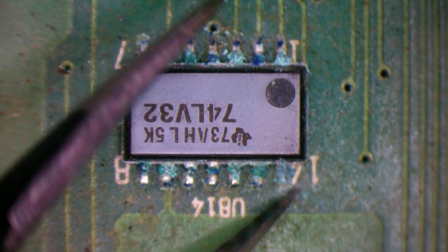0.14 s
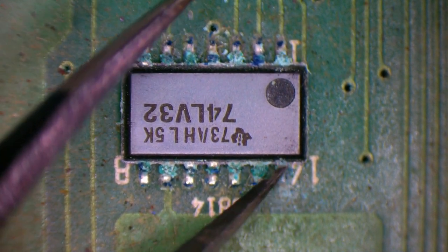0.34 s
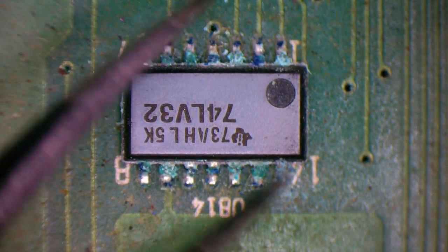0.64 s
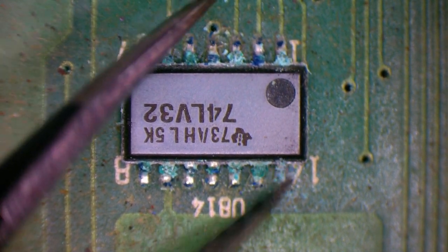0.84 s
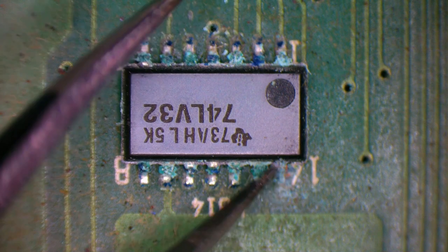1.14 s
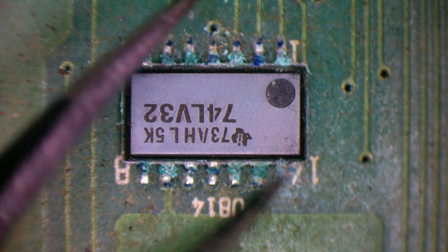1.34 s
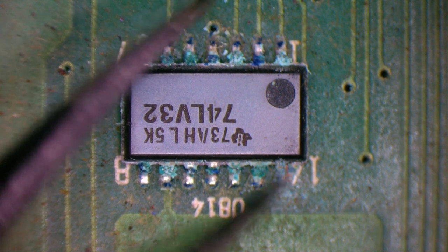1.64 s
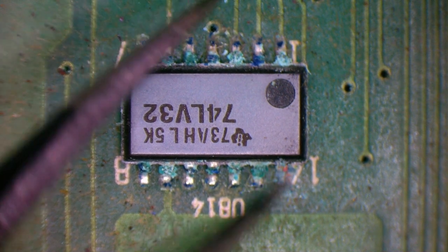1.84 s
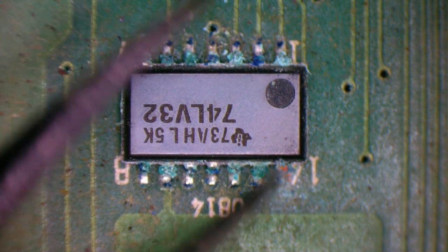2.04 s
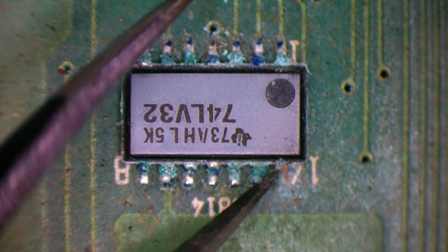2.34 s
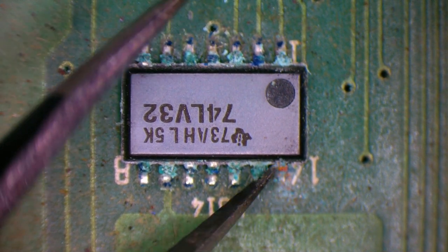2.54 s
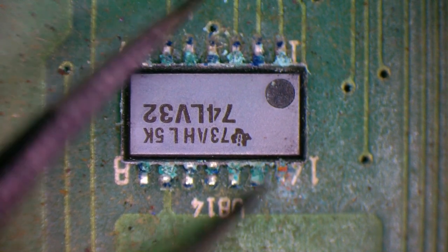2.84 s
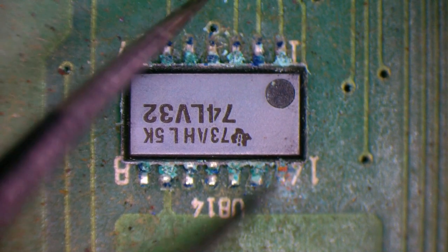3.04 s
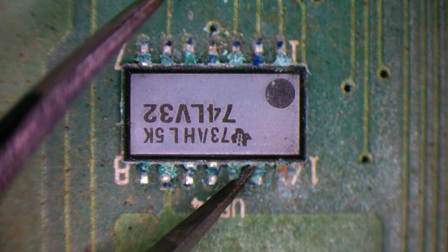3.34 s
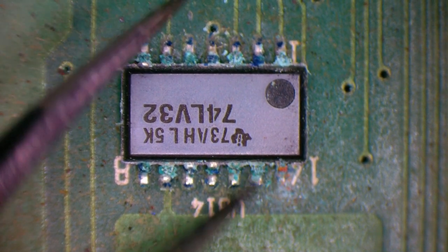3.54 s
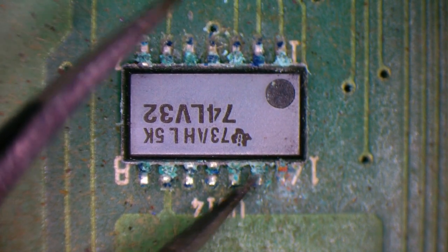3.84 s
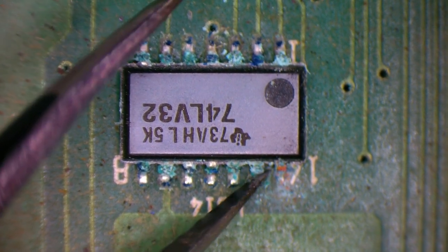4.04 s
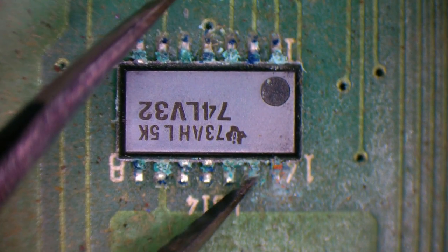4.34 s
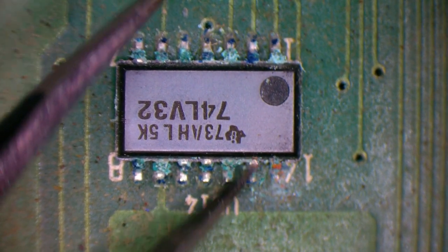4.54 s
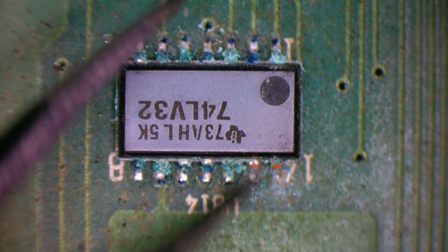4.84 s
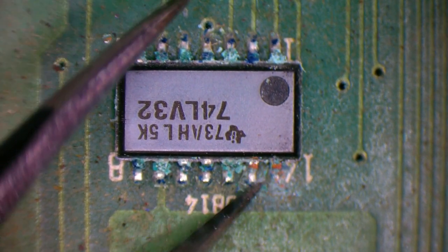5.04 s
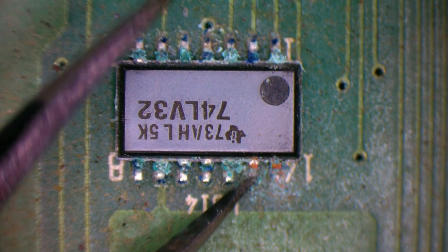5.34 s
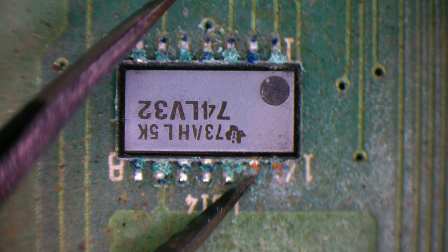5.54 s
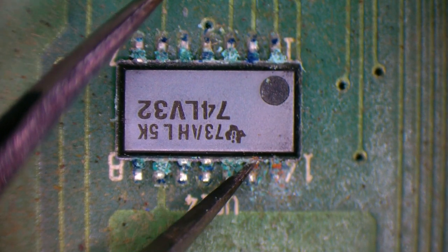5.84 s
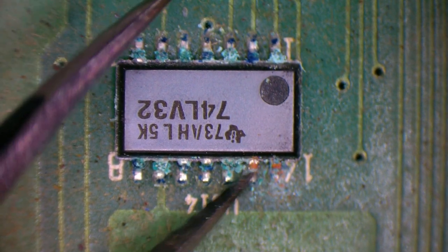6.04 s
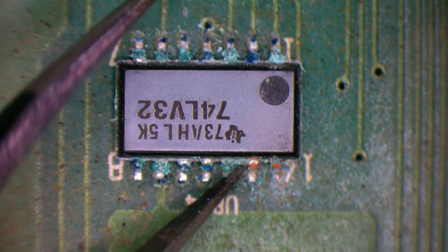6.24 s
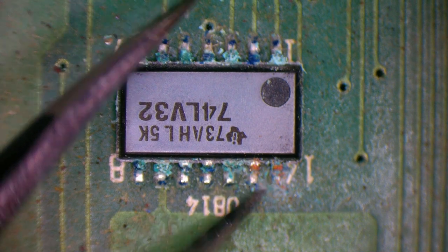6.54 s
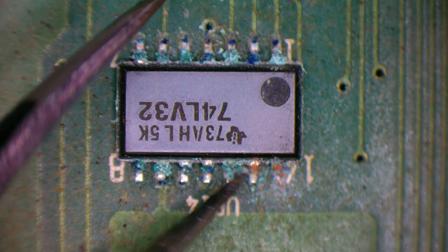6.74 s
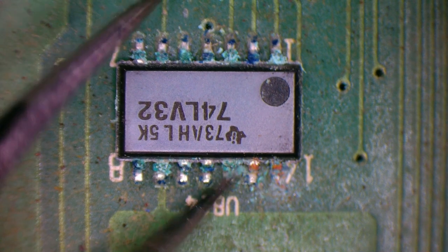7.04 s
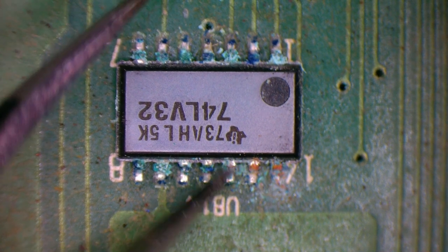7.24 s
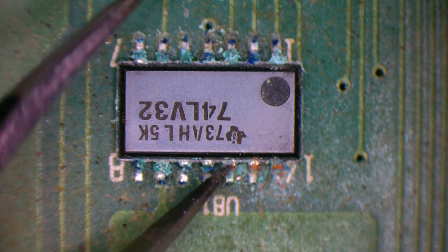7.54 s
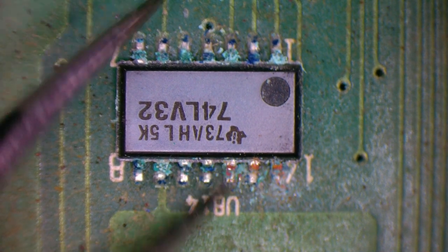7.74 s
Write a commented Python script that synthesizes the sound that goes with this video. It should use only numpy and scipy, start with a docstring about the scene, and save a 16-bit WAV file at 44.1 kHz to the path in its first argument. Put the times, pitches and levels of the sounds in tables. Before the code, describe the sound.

Fine steel tweezers pick at the legs of a chip on a circuit board, heard close up in a small room. Quiet, dry metallic ticks start right away and continue unevenly, several a second, often doubled as the tip grazes a leg before landing. Sharper clicks stand out at about 0.6, 1.6, 2.2 and 4.2 seconds, and one of the strongest comes at 7.5 seconds, with a last tick just after.

Very brief, gritty scrapes over solder slip in between the taps, clearest around 1.5, 2.1 and 2.7 seconds, then fainter between 4.3 and 4.8 seconds. Firmer touches add a soft, dull knock from the bench, as near 0.8, 4 and 7.4 seconds. The ticking is a little lighter from about 5 to 6.5 seconds. A steady low electrical hum runs underneath throughout, with a deep rumble and a faint hiss.

```python
"""Fine steel tweezers pick at the legs of a chip on a circuit board, close up in a small room.
Each touch is a millisecond or two of tiny slips that rings the board and the steel; sharp ones
crack the solder and firm ones thump the bench. Now and then the tip drags over solder with a rasp.
Mains hum, rumble and a faint hiss lie underneath."""
import sys
import numpy as np
from scipy import signal
from scipy.fft import rfft, irfft
from scipy.io import wavfile
from scipy.ndimage import uniform_filter1d

SR = 44100
rng = np.random.default_rng(int(sys.argv[2]) if len(sys.argv) > 2 else 0)


def inscribe(sig):
    """Save sig as 16-bit PCM at rate SR to the path in sys.argv[1].

    A 1-D sig is mono; a 2-D sig holds one channel per row.
    Samples are clipped to [-1, 1] before scaling.
    """
    pcm = np.round(np.clip(np.atleast_2d(sig).T, -1, 1) * 32767)
    wavfile.write(sys.argv[1], SR, pcm.astype(np.int16))


N = 347508

# touches of the tip: start_s, strength_db, hardness_db, push_db, weight_db
# the last three add to the strength, for the treble, the board and the bench in turn
TOUCHES = [(0.144, -61.5, 0, 4, 6), (0.1574, -63, -3, 4, -8), (0.3183, -57.5, -16, 7.5, -11),
           (0.3459, -54, -1.5, 3.5, -4), (0.5133, -70.5, -12, 11, -5), (.591, -48.5, 3, -1.5, -8),
           (.763, -58.5, -5, -5, -8), (0.7704, -60, 2.5, 5, 9), (.9377, -67, -7, 3, -8),
           (1.006, -62, 7, 5, -3), (1.141, -53.5, -7.5, 3.5, -14), (1.361, -56.5, -14, -10, -10),
           (1.3677, -59, 2.5, 4, -6), (1.5526, -48.5, -8, -8, -15), (1.564, -56, -4, -13, -15),
           (1.5686, -46, 5.5, -2, -2), (1.7482, -58, -5, -12, -10), (1.7518, -56.5, -11, 12, -3),
           (1.91, -76, -8, 20, 0), (1.9839, -56, 13.5, 4.5, 1), (2.161, -50.5, 0.5, 3, 1),
           (2.177, -68, -4, 7, -8), (2.1905, -63, 1, -4, 4), (2.3346, -63, -10, 7.5, -6),
           (2.3835, -72, 8, -5, -8), (2.5738, -52.5, 5, 7.5, -16), (2.5797, -57, 4.5, 5, -12),
           (2.763, -65, 0, 1, -10), (2.793, -60, -6, 0, -12), (3.0172, -57.5, 6.5, -3, -10),
           (3.0222, -66.5, 7, 10, -6), (3.249, -63.5, 4, 7, -8), (3.559, -61.5, 2.5, 2, -10),
           (3.741, -64, -10, 0, -8), (3.919, -65.5, -16, 10, -2), (3.9542, -59.5, 7, 3, 13),
           (4.2336, -54.5, -5, -2, -2), (4.243, -52, 5, -12, 2.5), (4.362, -62.5, 6.5, 8, -6),
           (4.3672, -60, -9, 2, -7), (4.5361, -68, -11, 11, -5), (4.564, -55.5, -6, 5.5, -10),
           (4.723, -69, -13, 13.5, -5), (4.761, -58, 7, 8, 2), (4.9467, -61, -1, 0, -12),
           (5.131, -65, 4, -12, -10), (5.1353, -60.5, -2, 11.5, 4), (5.478, -57.5, 0.5, 1, 2),
           (5.6648, -59.5, 4, 6.5, -12), (5.7614, -78, 14.5, 6, -5), (5.964, -79, 15.5, 12, -5),
           (6.0143, -64, 0, -8, -10), (6.3134, -56.5, -1.5, 1.5, -12), (6.4781, -80, 14, 3, -5),
           (6.746, -52.5, 2, 2, -12), (6.835, -62.5, -11, -10, -10), (6.8444, -66.5, 6.5, 0, 9),
           (6.9053, -62.5, -12, -10, -8), (7.0037, -62.5, 12.5, 2, -4), (7.1583, -56.5, 3.5, -14, 5),
           (7.3558, -63, 3.5, 5, 13), (7.4976, -68, -1, 10, -5), (7.5021, -45.5, 2, 1, -3),
           (7.6878, -54.5, 2, 1, 3)]
# steel modes of the tweezers, from low ring to high ping: pitch_hz, relative_db, t60_s
ARM_MODES = [(1394, -2.5, 0.0076), (1500, -3.5, 0.016), (1715, -1.5, 0.012), (1912, 4.5, 0.0079),
             (2023, 0.5, 0.013), (2330, -5.5, 0.008)]
SHANK_MODES = [(2824, 4, 0.011), (3040, 2.5, 0.014), (3380, 1, 0.011), (3800, -2.5, 0.0097),
               (4230, -3, 0.0047), (4520, -5, 0.019), (4940, -2, 0.0063)]
TIP_MODES = [(5500, -4, 0.0066), (6594, -5, 0.016), (7430, 6, 0.0062), (8170, 6, 0.0067),
             (9270, -3.5, 0.015), (10050, -7.5, 0.016)]


def from_db(db):
    """Decibels to gain."""
    return 10 ** (np.asarray(db) / 20)


def unit_rms(x):
    """Scale to rms 1."""
    return x / np.sqrt(np.mean(x ** 2) + 1e-20)


def unit_energy(x):
    """Scale to energy 1."""
    return x / np.sqrt(np.sum(x ** 2) + 1e-20)


def seconds(length_s):
    """A time axis."""
    return np.arange(int(length_s * SR)) / SR


def add(out, start_s, sound):
    """Mix a sound in at its start time."""
    at = max(round(start_s * SR), 0)
    out[at:at + len(sound)] += sound[:max(N - at, 0)]


def coloured_noise(spectrum, size):
    """White noise through an EQ curve of freq_hz, gain_db."""
    hz, db = np.transpose(spectrum)
    bins_hz = np.maximum(np.fft.rfftfreq(size, 1 / SR), 1)
    gain = from_db(np.interp(np.log(bins_hz), np.log(hz), db))
    return irfft(rfft(rng.standard_normal(size)) * gain, size)


def ringing(modes, t, spread_db):
    """Decaying modes of alternating sign; each point of contact shares the blow out differently."""
    hz, db, t60_s = np.transpose(modes)[:, :, None]
    signs = np.where(np.arange(len(modes)) % 2, -1, 1)[:, None]
    struck_db = db + spread_db * rng.standard_normal(db.shape)
    envelopes = from_db(struck_db - 60 * t / t60_s)
    return np.sum(signs * envelopes * np.sin(2 * np.pi * hz * t), axis=0)


def with_echoes(x, colour, delay_s, t60_s):
    """A sound followed by a dense, dying cloud of echoes."""
    t = seconds(t60_s + delay_s)
    tail = unit_energy((t >= delay_s) * from_db(-60 * t / t60_s))
    response = coloured_noise(colour, size=len(t)) * tail
    response[0] += 1   # direct sound
    return signal.fftconvolve(x, response)


def hiss(level_db=-62):
    """A faint, steady noise bed that thins towards the treble."""
    # hiss spectrum: freq_hz, relative_db
    spectrum = [(70, 2), (125, 0.5), (190, -8), (240, -3), (315, -11), (410, -11), (490, -13), (620, -12.5),
                (950, -17), (1700, -19.5), (3800, -24), (8000, -26.5), (15550, -28), (15950, -48)]
    return from_db(level_db) * unit_rms(coloured_noise(spectrum, size=N))


def rumble(level_db=-44.5):
    """Deep noise at and below the bottom of hearing."""
    # rumble spectrum: freq_hz, relative_db
    spectrum = [(4, 1.5), (10, 9.5), (17, -2), (27, -4), (34, -19.5), (39, -5), (48, -25), (70, -53),
                (300, -120)]
    return from_db(level_db) * unit_rms(coloured_noise(spectrum, size=N))


def hum(mains_hz=50.08):
    """Steady mains tone with mostly odd harmonics."""
    # mains partials: harmonic_number, rms_db
    partials = [(1, -35.5), (2, -73), (3, -62), (5, -70.5), (7, -80.5), (9, -75), (11, -95.5), (17, -84.5)]
    phase = 2 * np.pi * mains_hz * np.arange(N) / SR
    return sum(np.sqrt(2) * from_db(db) * np.sin(harmonic * phase) for harmonic, db in partials)


def small_room(x):
    """The room throws back a short, quiet tail."""
    # tone of the reflections: freq_hz, gain_db
    colour = [(200, -21), (600, -7.5), (3000, -16), (5000, -16), (8000, -23), (12000, -18), (16000, -28)]
    return with_echoes(x, colour, delay_s=.0098, t60_s=.24)[:N]


def bench_thumps():
    """The bench gives a dull knock with the weight behind each touch."""
    # low modes of the bench: pitch_hz, relative_db, t60_s
    bench_modes = [(105.4, -13, 0.28), (118, 0, 0.2), (252, -7, 0.053)]
    out = np.zeros(N)
    t = seconds(.3)
    for start_s, strength_db, _, _, weight_db in TOUCHES:
        knock = ringing(bench_modes, t, spread_db=1.5)
        add(out, start_s, from_db(strength_db + weight_db) * knock)
    return out


def solder_scrapes(roughness_db=3, ring_db=-7):
    """The tip drags: dense, uneven slips swell into a rasp and keep the tweezers ringing."""
    # drags over solder: start_s, length_s, level_db
    drags = [(0.315, 0.081, -64), (1.119, 0.08, -67), (1.493, 0.058, -59.5), (1.757, 0.026, -61),
             (2.106, 0.12, -64), (2.748, 0.079, -58), (3.903, 0.056, -71), (4.311, 0.05, -67.5),
             (4.441, .04, -64), (4.712, 0.11, -69), (6.826, .09, -83)]
    # rasp of the solder grain: freq_hz, relative_db
    rasp = [(200, 0), (500, 9.5), (1300, -1), (3400, -4), (6000, -5.5), (7200, -7), (10000, -10),
            (15500, -14)]
    out = np.zeros(N)
    t = seconds(.04)
    for start_s, length_s, level_db in drags:
        stroke = np.sin(np.pi * seconds(length_s) / length_s)
        bumps = unit_rms(uniform_filter1d(rng.standard_normal(len(stroke)), size=60))
        grit = coloured_noise(rasp, size=len(stroke)) * from_db(roughness_db * bumps)
        slips = unit_rms(grit) * stroke
        steel = ringing(ARM_MODES + SHANK_MODES + TIP_MODES, t, spread_db=8)
        body = from_db(ring_db) * unit_energy(steel)
        body[0] += 1   # the bare rasp
        add(out, start_s, from_db(level_db) * signal.fftconvolve(slips, unit_energy(body)))
    return out


def slip_burst(level_db, soft_db=-58, firm_db=-42):
    """A burst of tiny slips: a firm touch snaps quickly, a light one slides a little longer."""
    t = seconds(.012)
    length_s = np.interp(level_db, [soft_db, firm_db], [.0018, .0011])
    fade = np.exp(-(t / length_s) ** 2)
    slips = rng.standard_normal(len(t)) * fade
    for _ in range(4):   # a hard point feeds all pitches about equally
        flat_spectrum = np.exp(1j * np.angle(rfft(slips)))
        slips = irfft(flat_spectrum, len(t)) * np.minimum(2 * fade, 1)
    return slips


def tweezer_tick(strength_db, hardness_db, push_db):
    """One burst of slips rings board, tweezers and solder; a harder contact sounds brighter."""
    # woody modes of the circuit board: pitch_hz, relative_db, t60_s
    board_modes = [(273, -8, 0.014), (395, -6.5, 0.049), (460, -4, 0.021), (492, -10, 0.04),
                   (594, -4, 0.02), (662, -5.5, .035), (750, -8, 0.019), (950, -6.5, 0.0065),
                   (1145, -7.5, 0.015)]
    # brittle crack of the solder: pitch_hz, relative_db, t60_s
    crack_modes = [(11200, -13, 0.0054), (11250, 1, 0.0032), (12230, -4, 0.011), (13000, -17, 0.0059),
                   (14400, -2.5, 0.0059), (15600, -4, 0.0057)]
    # tone of the early reflections off the bench: freq_hz, gain_db
    near_colour = [(200, 0.5), (600, -8), (3000, -4.5), (4600, -0.5), (8000, -13), (12500, -9),
                   (16000, -19)]
    board_db, arms_db, shanks_db = strength_db + push_db - 2, strength_db - .6, strength_db + .26
    tips_db = strength_db + hardness_db + 1.1
    crack_db = tips_db + .3 * (tips_db + 33)   # needs a sharp touch: draws level with the tips at -33 dB
    levels_db = [board_db, arms_db, shanks_db, tips_db, crack_db]
    parts = [board_modes, ARM_MODES, SHANK_MODES, TIP_MODES, crack_modes]
    slips = slip_burst(max(levels_db))
    gains = from_db(levels_db) * np.sqrt(.0035 * SR)   # each part carries the energy of 3.5 ms at its level
    t = seconds(.07)
    tick = 0
    for modes, gain in zip(parts, gains):
        ring = signal.fftconvolve(slips, ringing(modes, t, spread_db=2.5))
        tick += gain * unit_energy(ring)
    # nearby echoes change as the hands move, so each tick gets its own
    return with_echoes(tick, near_colour, delay_s=.003, t60_s=.044)


def tweezer_picking():
    """The tip picks at the legs in an uneven rhythm, often grazing one just before it lands."""
    out = np.zeros(N)
    for start_s, strength_db, hardness_db, push_db, _ in TOUCHES:
        add(out, start_s, tweezer_tick(strength_db, hardness_db, push_db))
    return out


def scene():
    """Tweezer work in a small room, over hiss, rumble and hum, in mono."""
    bed = hiss() + rumble() + hum()
    work = small_room(tweezer_picking() + solder_scrapes())
    return (bed + bench_thumps() + work)[None]


def record(dry):
    """A steep low-pass takes off the very top."""
    cutoff_hz = 16300
    return signal.sosfilt(signal.ellip(10, .1, 80, cutoff_hz, fs=SR, output="sos"), dry)


dry = scene()
out = record(dry)
inscribe(out)
```